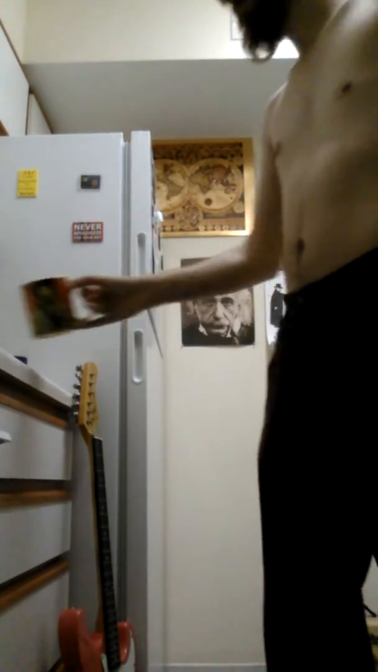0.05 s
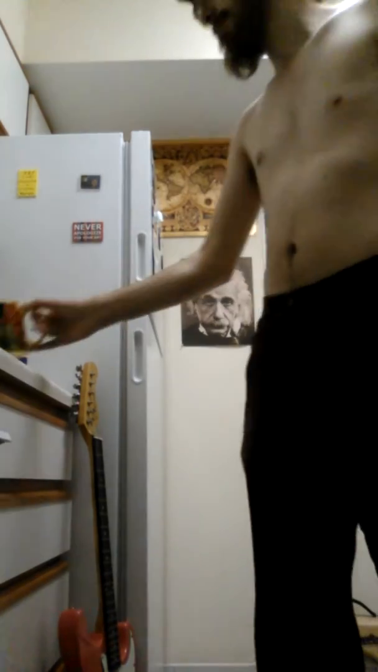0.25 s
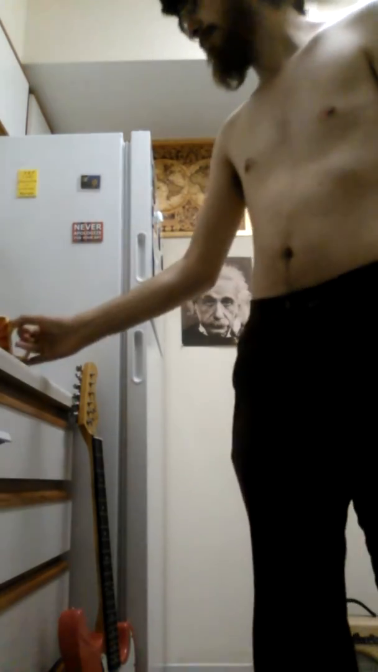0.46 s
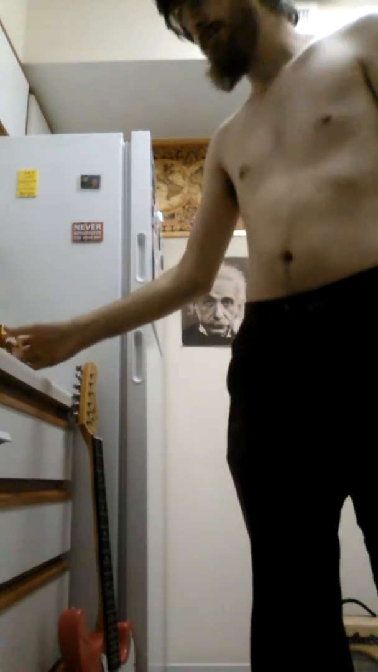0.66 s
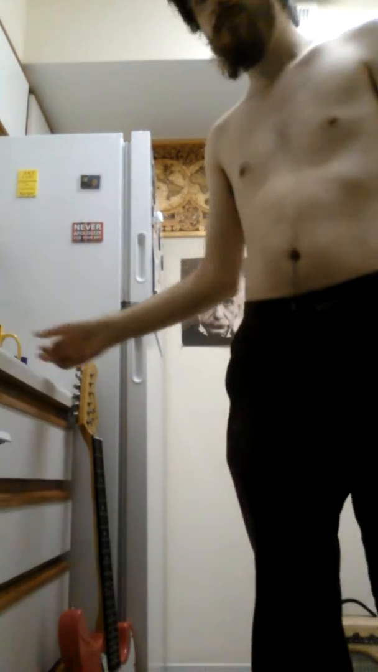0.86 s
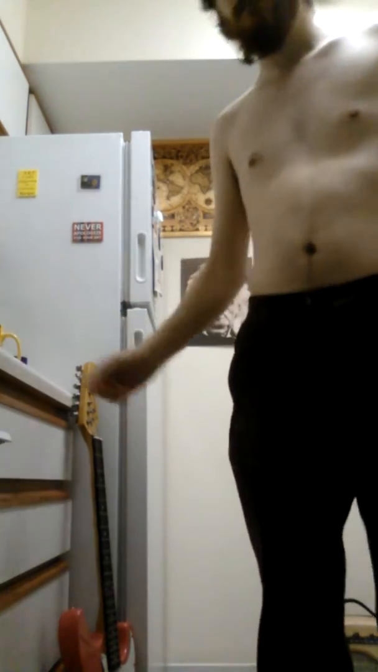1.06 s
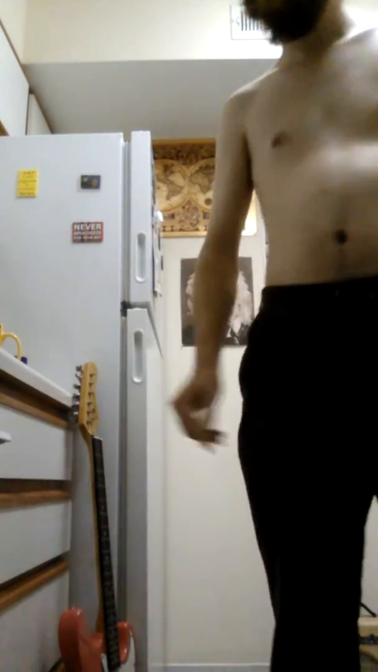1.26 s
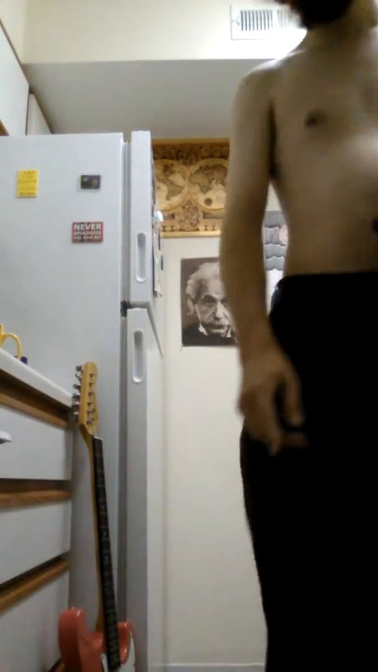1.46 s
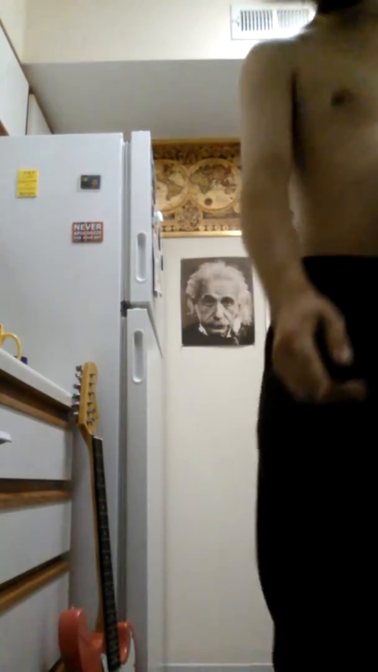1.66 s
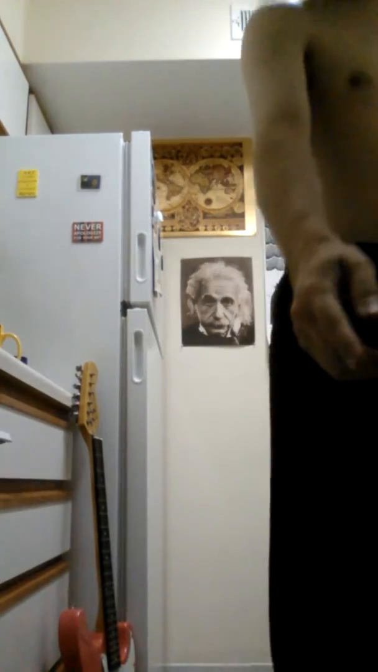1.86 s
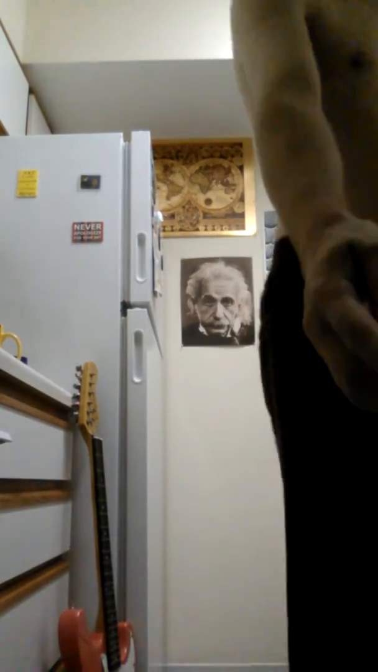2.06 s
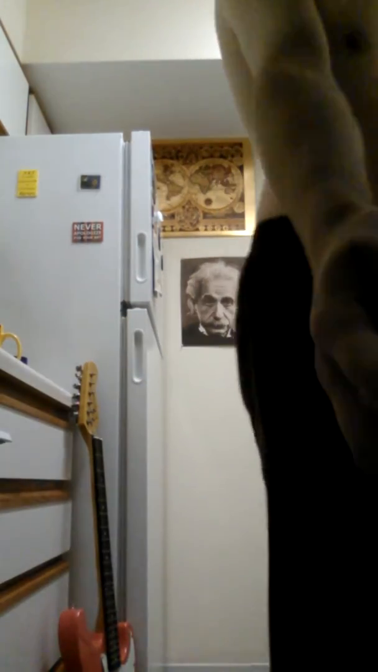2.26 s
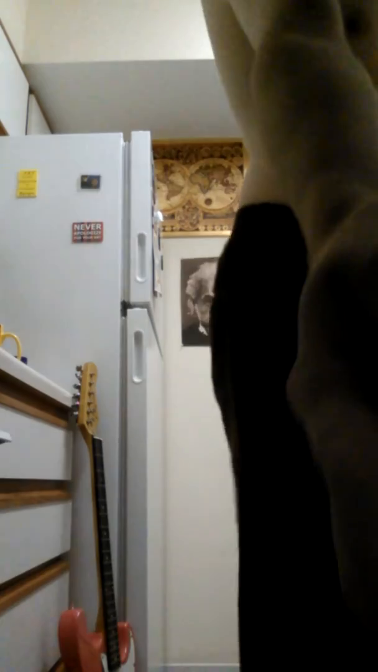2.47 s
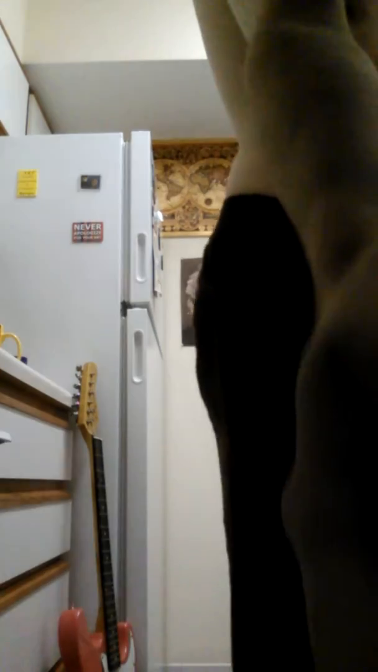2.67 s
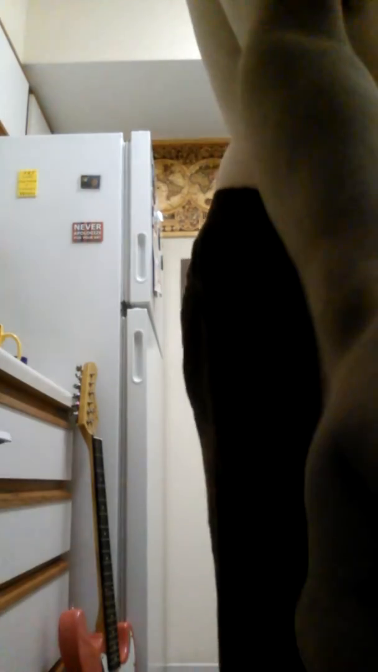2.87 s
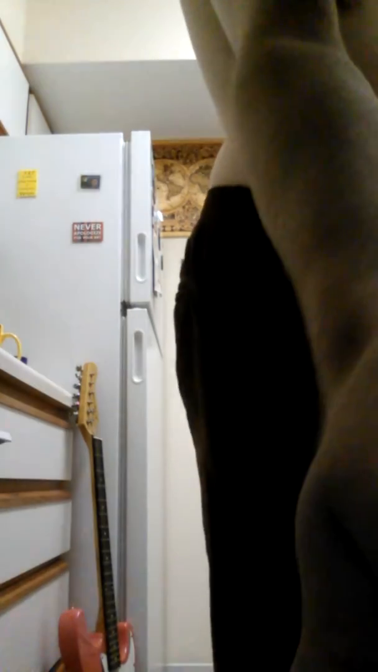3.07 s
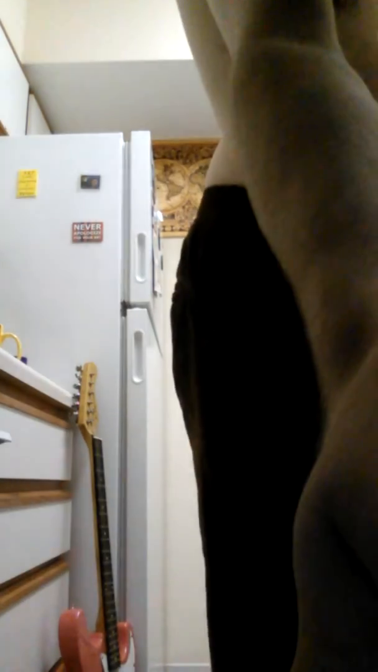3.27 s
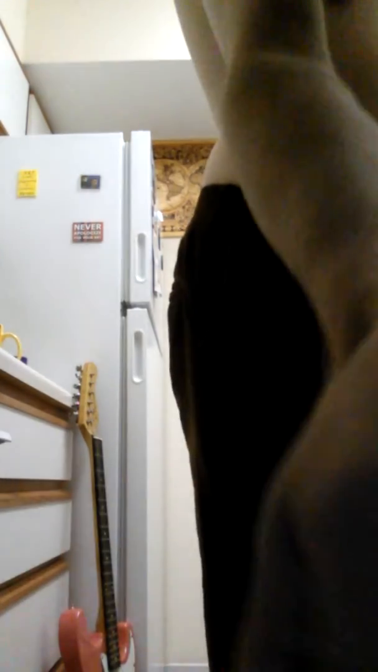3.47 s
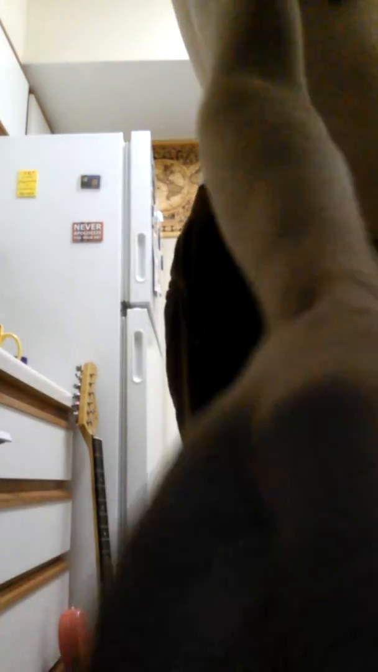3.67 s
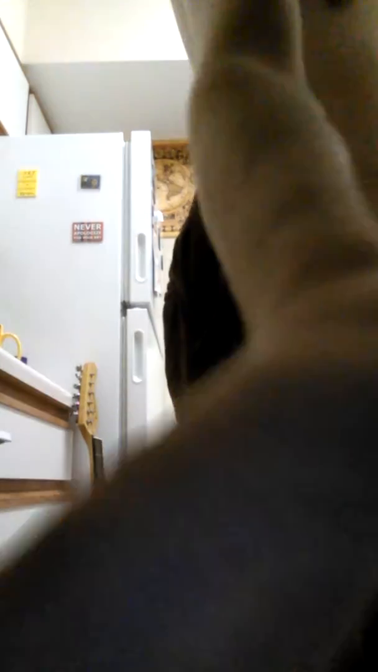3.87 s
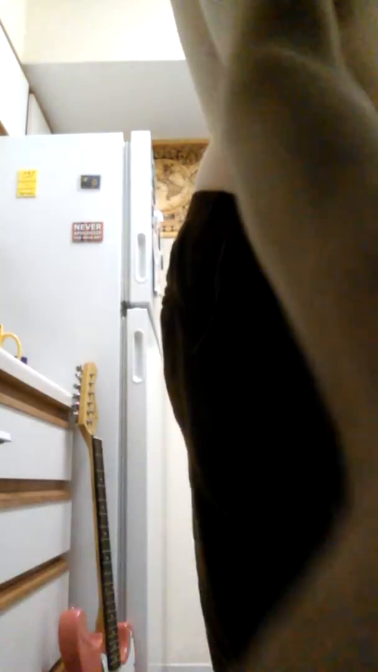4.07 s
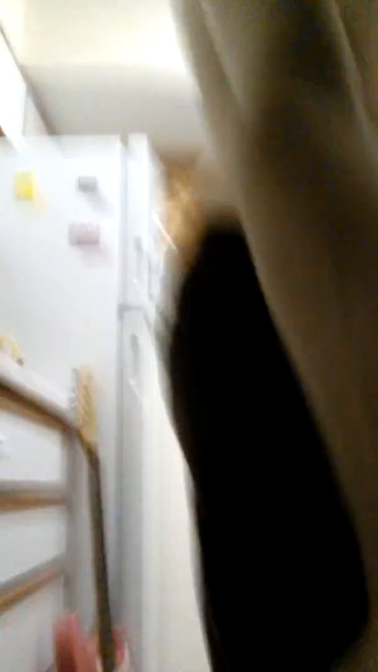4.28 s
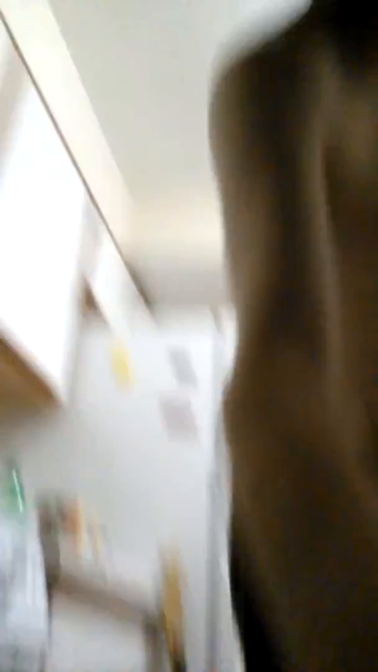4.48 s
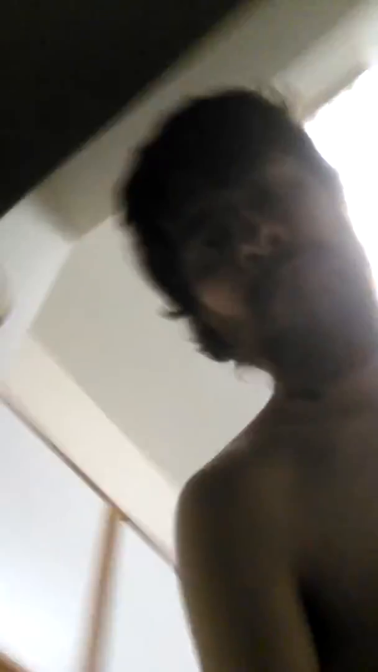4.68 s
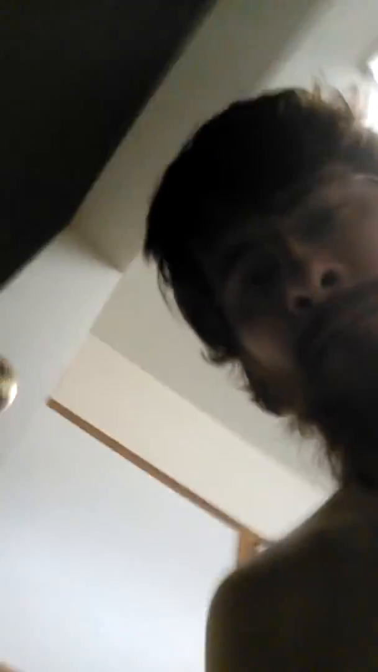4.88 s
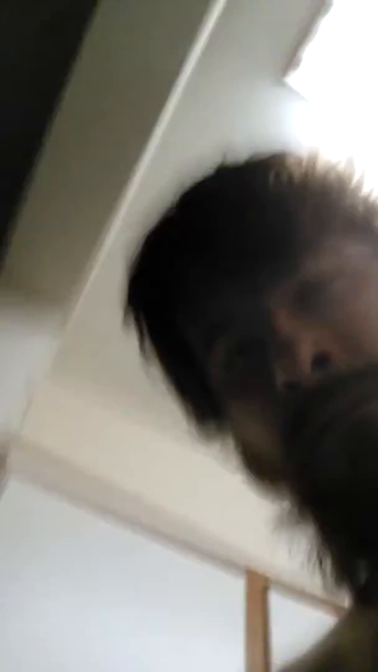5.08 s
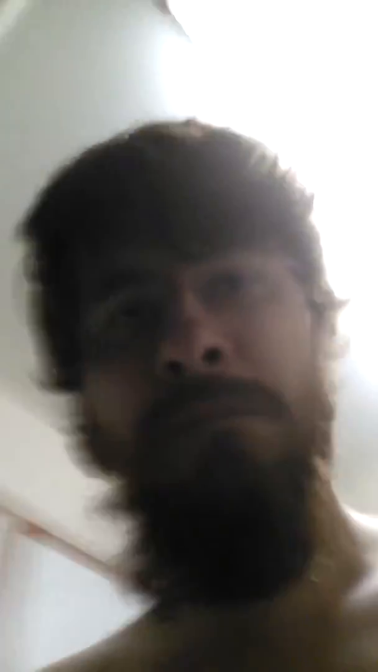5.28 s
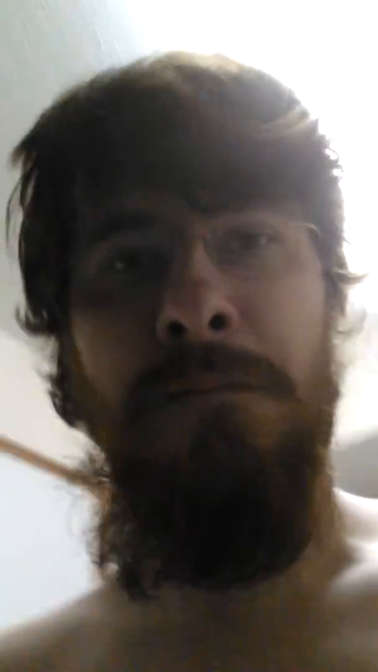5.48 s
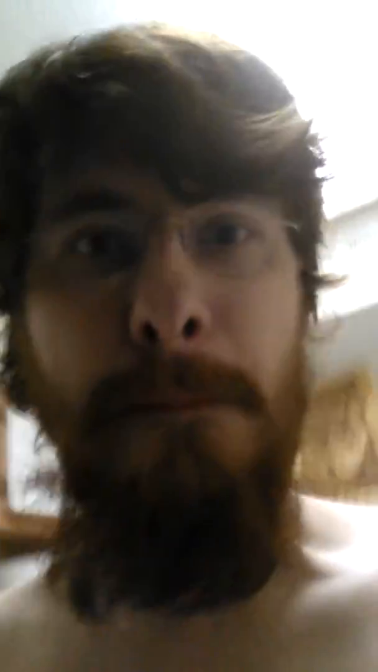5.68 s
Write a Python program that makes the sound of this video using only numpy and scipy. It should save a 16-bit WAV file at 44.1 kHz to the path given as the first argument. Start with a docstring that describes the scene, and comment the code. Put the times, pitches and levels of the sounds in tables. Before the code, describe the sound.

Camera microphone standing in a modest, short-echo kitchen. Two strong hollow counter knocks from a mug come within the first second, joined by a short rough drag. Quiet hum, airy hiss and a few faint steps fill the middle. Then fingers grab the plastic case, very close and dry: a rapid cluster of snaps and thuds, a brief rumbling lull, and more scattered clicks and skin rubs until the end.

```python
"""A ceramic mug knocks on a kitchen counter, judders as it slides, and drops flat with a short ring.
Knocks are damped modes plus shaped noise; the slide is stick-slip pulses and noise through resonances.
A fridge hums (sines) while someone shuffles over (noise bursts, damped tones) to a camera and picks it up:
its plastic case clicks (damped bursts), rubs (grainy noise) and rumbles (low noise) at the microphone."""
import sys
import numpy as np
from scipy import signal
from scipy.fft import rfft, irfft, next_fast_len
from scipy.io import wavfile
from scipy.ndimage import map_coordinates

SR = 44100
rng = np.random.default_rng(int(sys.argv[2]) if len(sys.argv) > 2 else 0)


def wav_record(signal):
    """Record a signal, one row per channel, as 16-bit PCM in the file named by sys.argv[1]."""
    frames = np.transpose(np.atleast_2d(signal))
    bounded = np.clip(frames, -1, 1)
    # unit amplitude maps onto the largest positive 16-bit level
    quanta = np.round(bounded * 32767).astype(np.int16)
    wavfile.write(sys.argv[1], SR, quanta)


N = 253134
TIME = np.arange(N) / SR

# mug blows on the counter: (time [s], level [dB], contact cut-off [Hz], boom [dB], ceramic ring [dB])
MUG_BLOWS = [(0.44, -4, 1806, 0.5, -46), (0.6501, -2, 3016, -6, -16)]
# counter and cabinet modes: (frequency [Hz], nominal level [dB], t60 [s])
COUNTER_MODES = [(87.3, -2.5, 0.29), (123.6, -4, 0.33), (161.4, -6.5, 0.24), (238.7, -10, 0.34),
                 (320, -9.5, 0.2), (386.4, -8, .3), (434.6, -0.5, 0.3), (527.4, -1, 0.29), (657, -7.5, .2),
                 (677, -6.5, 0.19), (805, -4.5, .22), (960, -2.5, 0.18), (1018, -4, .24),
                 (1233, -6.5, 0.12), (1420, -7.5, 0.18), (1442, -3.5, 0.17), (1585, -4.5, .2),
                 (1762, -3, 0.17), (1940, -13, .25), (2420, -20.5, .25)]
# mug wall modes: (frequency [Hz], level [dB], t60 [s])
CERAMIC_MODES = [(2924, 0.5, 0.44), (7400, -15, .33), (7830, -20.5, 0.27), (8930, -22, .36),
                 (9679, -24.5, .34), (12500, -28, .22), (13900, -30, .2)]
# dense counter response: (frequency [Hz], relative density [dB per Hz])
BOARD_SPECTRUM = [(40, -28.5), (80, 2), (130, -9.5), (200, -8), (420, 0.5), (750, -3), (1100, -2.5),
                  (1750, -5), (2600, -13.5), (4500, -21), (9500, -25.5), (15000, -44.5)]
# kitchen decay: (frequency [Hz], t60 [s])
KITCHEN_DECAY = [(80, 0.52), (400, 0.29), (1200, 0.29), (3000, 0.28), (8000, 0.33), (15000, 0.11)]
# resonances under the drag: (frequency [Hz], width [Hz], level [dB])
DRAG_PEAKS = [(313, 30, 6.5), (465, 85, -5.5), (830, 250, -8), (1320, 520, -36.5)]
# finger squeaking off the glaze: (time [s], start [Hz], end [Hz], level [dB], t60 [s])
FINGER_RELEASE = (.967, 2800, 2650, -42, .2)
# feet and cloth brushing: (time [s], level [dB], rise [s], t60 [s], hiss centre [Hz], hiss level [dB])
FOOT_BRUSHES = [(0.143, -41, 0.0022, 0.29, 8350, -44.5), (0.965, -37, 0.004, 0.2, 6040, -41.5),
                (1.439, -45, 0.011, 0.54, 6500, -72), (1.532, -39.5, 0.017, 0.23, 6570, -45.5),
                (3.116, -36, 0.0011, 0.049, 12500, -53), (3.14, -54, 0.026, 0.42, 5440, -54.5),
                (3.465, -42.5, 0.023, 0.054, 5700, -55)]
# brushing cloth: (frequency [Hz], relative density [dB per Hz])
CLOTH_SPECTRUM = [(1180, -6.5), (2000, -8), (2220, -8.5), (2640, -14), (3610, -15), (5490, -9.5),
                  (8260, -1.5), (11000, -5), (16000, -25)]
# floor creaks and footfalls: (time [s], level [dB], pitch [Hz], t60 [s], tick level [dB])
FLOOR_STEPS = [(0.146, -39.5, 169, .15, -49), (0.975, -33.5, 191, 0.14, -40),
               (3.1198, -31.5, 496, 0.17, -33), (3.168, -33.5, 484, 0.26, -45),
               (3.235, -31, 134, 0.064, -36.5)]
# tick of a step: (frequency [Hz], relative density [dB per Hz])
STEP_TICK_SPECTRUM = [(200, 0), (1000, 8.0), (2200, -3.5), (3500, -13.5), (15000, -41)]
# case clicking under the fingers: (time [s], level [dB], shell pitch [Hz], snap level [dB])
CASE_CLICKS = [(4.258, -29.5, 1050, -50), (4.268, -34, 2310, -32.5), (4.298, -39, 1400, -30),
               (4.3295, -29, 1940, -31), (4.412, -11.5, 2190, -17), (4.4148, -13.5, 2060, -2),
               (4.4332, -22.5, 1850, -20), (4.7229, -29.5, 1620, -46), (4.7871, -22, 1370, -31.5),
               (4.7945, -18.5, 1590, -42), (4.831, -26, 1320, -36), (4.8476, -21.5, 1600, -32),
               (4.87, -28.5, 1740, -47), (5.076, -24.5, 1300, -22.5), (5.084, -25.5, 1360, -22.5),
               (5.1352, -15, 1970, -21), (5.1444, -15, 1740, -13.5), (5.1967, -31, 1800, -29),
               (5.2654, -10.5, 2110, -9.5), (5.3353, -28, 1200, -38), (5.3686, -8, 1510, -20),
               (5.411, -21, 1040, -33.5), (5.5342, -26, 2070, -32.5), (5.641, -34.5, 1040, -58)]
# creaking runs of ticks as the grip tightens: (time [s], length [s], mean level [dB])
GRIP_CREAKS = [(4.3, .06, -29), (4.386, .045, -22), (4.731, .012, -33.5), (4.835, .022, -29.5),
               (5.12, 0.042, -25)]
# camera rocking on its support as it is seized: (time [s], level [dB], snap level [dB])
CASE_BUMPS = [(4.3044, -21.5, -20), (4.3119, -18, -10), (4.342, -20.5, -35), (4.3467, -8, -10),
              (4.356, -18, -28), (4.3595, -17, -28), (4.3667, -22.5, -5.5)]
# bright snap of the case: (frequency [Hz], relative density [dB per Hz])
SNAP_SPECTRUM = [(2500, -9), (4700, 1), (6000, -3.5), (7500, -1.5), (10500, -2), (13000, -15), (16000, -25)]
# grit of the shell: (frequency [Hz], relative density [dB per Hz])
GRIT_SPECTRUM = [(400, -12.5), (1000, 2), (2300, -7), (3500, -7.0), (8000, -31.0)]
# fingers sliding on the case: (time [s], length [s], level [dB], sizzle level [dB])
FINGER_RUBS = [(4.147, 0.35, -46.5, -60), (4.35, 0.11, -22, -36), (4.391, 0.25, -49.5, -52.5),
               (4.66, 0.25, -48.5, -57), (4.822, 0.052, -34.5, -52), (4.846, 0.24, -48.5, -46.5),
               (5.012, 0.42, -43, -56), (5.329, 0.073, -29.5, -36), (5.387, 0.075, -40.5, -42.5),
               (5.446, 0.09, -41, -42)]
# skin on plastic: (frequency [Hz], relative density [dB per Hz])
SKIN_SPECTRUM = [(150, 1.5), (600, -2.5), (1600, 3.5), (2900, -9), (4100, -7), (5500, -9), (10500, -7),
                 (13000, -20), (16000, -21)]
# bright part of a rub: (frequency [Hz], width [Hz], level [dB])
SIZZLE_PEAK = [(10100, 3600, 0)]
# skin catching: (time [s], length [s], pitch [Hz], level [dB])
SKIN_SQUEAKS = [(5.28, 0.13, 8000, -46.5), (5.461, 0.044, 10900, -35), (5.462, 0.071, 6170, -35.5),
                (5.629, 0.14, 7060, -46)]
# handling rumble: (frequency [Hz], relative density [dB per Hz])
SHAKE_SPECTRUM = [(8.8, -25.5), (15, 8), (49, 3.5), (145, -19.5), (216, -17), (326, -39), (373, -28),
                  (400, -28), (520, -58), (880, -120)]
# the hand heaving the camera about: (time [s], length [s], level [dB])
HAND_HEAVES = [(4.31, 0.066, -27), (4.615, 0.22, -26.5), (4.78, 0.28, -28.5), (5.33, 0.11, -41)]
# room air: (frequency [Hz], relative density [dB per Hz])
AIR_SPECTRUM = [(20, -1.5), (50, 4), (90, -20.5), (130, -7.5), (190, -8), (240, -4), (330, -2.5),
                (420, -9.5), (850, -12.5), (1200, -16), (2000, -23), (4000, -35.5), (8000, -85)]
# hiss and rustle: (frequency [Hz], relative density [dB per Hz])
HISS_SPECTRUM = [(1800, -36.5), (3000, -13), (5000, -8), (7000, -6.5), (8400, 1.5), (10000, -3.5),
                 (12000, -8.5), (14000, -10.5), (16000, -19.5)]
# fridge hum: (frequency [Hz], nominal level [dB rms])
FRIDGE_HUM = [(21.5, -58), (43.1, -48), (64.5, -59), (118.4, -64), (220.7, -60), (312.2, -60)]
# fridge's electrical whine: (frequency [Hz], nominal level [dB rms])
FRIDGE_WHINE = [(5152, -78.5), (8226, -62.5)]
# fridge vent: (frequency [Hz], width [Hz], level [dB])
VENT_PEAK = [(344, 99, 0)]
# trousers rustling as the body moves: (time [s], length [s], level [dB])
TROUSER_RUSTLES = [(0, 0.17, -54.5), (.55, 0.47, -51), (1.5, 0.76, -57), (1.9, .9, -67.5), (3.4, .3, -70)]

# the push builds, holds, and eases as the mug tips flat
SLIDE_S, SLIDE_HOLD_S, SLIDE_DB = .588, 0.029, -19.5
SLIDE_RISE_DB_PER_S, SLIDE_FALL_DB_PER_S = 171.5, 400.5
# thud re level, port ring re snap
BUMP_THUD_DB, BUMP_SHELL_HZ, BUMP_PORT_DB = 1.5, 1150, -20
CASE_THUD_HZ, CONTACT_RISE_S = 343, 0.0011  # thud pitch is the median
CLICK_THUD_DB = -18.5  # re level: a finger barely moves the whole camera
# port ring for a 0 dB snap; for clicks it grows faster than the snap
PORT_HZ, PORT_DB, PORT_DB_PER_SNAP_DB = 4030, 1.5, 1.41
TICKS_PER_S, TICK_SPREAD_DB, TICK_HZ, TICK_SNAP_DB = 160, 2.5, 1640, -11  # snap re level
SQUEAK_WIDTH = 0.079  # share of the pitch
RUB_TAPER = 0.83  # share of a stroke spent rising and falling
# the camera comes up into the hand and trembles there
LIFT_S, LIFT_LENGTH_S, TREMOR_DB = 4.3, 0.13, -41.5
# room floor; the air is louder once the camera is held in the open and murmurs unevenly
AIR_DB, HISS_DB, AIR_LIFTED_DB = -48, -61, 2.5
AIR_WAVER_DB, AIR_WAVERS_PER_S = 0.54, 20
VENT_S, VENT_LENGTH_S, VENT_DB = 5.1, 0.643, -45.5  # heard while the microphone swings past it
# a leg passes in front of the microphone
SHADE_S, SHADE_WIDTH_S, SHADE_AIR_DB, SHADE_HISS_DB = 3.95, 0.31, -3, -5
MAINS_HZ, WHINE_SWING_RAD = 60, .8
HUM_LIFTED_DB = -3  # hum comes partly through the support and weakens in the hand
WHINE_BLOCKED_DB = -2  # from the leg's passing on, the body stays between fridge and microphone
TOP_HZ = 16000


def amp(db):
    """Decibels to gain."""
    return 10 ** (np.asarray(db) / 20)


def unit(x):
    """Scale to rms 1."""
    return x / np.sqrt(np.mean(x ** 2) + 1e-20)


def along(points, hz):
    """(Hz, value) points read on a log frequency axis."""
    f, v = np.transpose(points)
    return np.interp(np.log(hz + 1), np.log(f + 1), v)


def wobble(rate, size=N):
    """A smooth random curve, rate knots a second."""
    knots = rng.standard_normal(int(size * rate / SR) + 4)
    return map_coordinates(knots, [TIME[:size] * rate])


def filtered(x, response):
    """x times a response of frequency."""
    m = next_fast_len(len(x) + 8192)
    hz = np.fft.rfftfreq(m, 1 / SR)
    return irfft(rfft(x, m) * response(hz), m)[:len(x)]


def noise(spectrum, size=N):
    """Coloured noise of rms 1."""
    white = rng.standard_normal(size)
    return unit(filtered(white, lambda hz: amp(along(spectrum, hz))))


def resonate(x, peaks):
    """x through parallel (Hz, width, dB) resonances of alternating sign."""
    def response(f):
        total = 0
        for k, (centre, width, db) in enumerate(peaks):
            damping = 1j * f * width
            total = total + (-1) ** k * amp(db) * damping / (centre * centre - f * f + damping)
        return total
    return filtered(x, response)


def fade(t, t60):
    """Exponential decay, 60 dB in t60 seconds."""
    return np.exp(-np.log(1000) * t / t60)


def ring(t, hz, t60):
    """One damped mode."""
    return np.sin(2 * np.pi * hz * t) * fade(t, t60)


def add(track, s, sound):
    """Mix a sound in at time s."""
    part = track[max(round(s * SR), 0):][:len(sound)]
    part += sound[:len(part)]


def swell(length, taper):
    """A stroke that rises, holds and falls; taper is the share spent rising and falling."""
    return signal.windows.tukey(int(length * SR), taper)


def strokes(rows, taper):
    """The envelope of (time, length, dB) strokes."""
    out = np.zeros(N)
    for s, length, db in rows:
        add(out, s, amp(db) * swell(length, taper))
    return out


def reverberant(x, hold):
    """Noise held level for hold seconds, then dying band by band."""
    hz, t, z = signal.stft(x, SR, nperseg=256)
    t60 = along(KITCHEN_DECAY, hz)[:, None]
    decay = fade(np.maximum(t - hold, 0), t60)
    return signal.istft(z * decay, SR, nperseg=256)[1][:len(x)]


def room(x, wet_db):
    """A source with the kitchen's answer."""
    tail = reverberant(rng.standard_normal(SR // 2), hold=0.014)
    return x + amp(wet_db) * signal.fftconvolve(x, tail / np.linalg.norm(tail))[:N]


def lifted():
    """0 while the camera stands, 1 once it is in the hand."""
    return np.clip((TIME - LIFT_S) / LIFT_LENGTH_S, 0, 1)


def tones(table, level_db, level_rate, phase):
    """Steady sines of wavering level; phase() gives each one's phase deviation."""
    out = np.zeros(N)
    for hz, db in table:
        level = amp(db + level_db * wobble(level_rate)) * np.sqrt(2)
        out += level * np.sin(2 * np.pi * hz * TIME + phase())
    return out


def background():
    """Fridge hum, vent and whine, room air, hiss and rustling cloth; a passing leg shades the microphone."""
    shade = np.exp(-((TIME - SHADE_S) / SHADE_WIDTH_S) ** 2)
    blocked = np.clip((TIME - SHADE_S) / SHADE_WIDTH_S, 0, 1)
    held = lifted()
    hum = tones(FRIDGE_HUM, 1.8, 3.6, lambda: 0.19 * wobble(5))
    buzz = WHINE_SWING_RAD * np.sin(2 * np.pi * MAINS_HZ * TIME)
    whine = tones(FRIDGE_WHINE, 1.5, 6, lambda: buzz + .4 * wobble(30))
    waver_db = AIR_WAVER_DB * wobble(AIR_WAVERS_PER_S)
    air_db = AIR_DB + SHADE_AIR_DB * shade + AIR_LIFTED_DB * held + waver_db
    air = amp(air_db) * noise(AIR_SPECTRUM)
    vent = unit(resonate(rng.standard_normal(N), VENT_PEAK))
    vent *= strokes([(VENT_S, VENT_LENGTH_S, VENT_DB)], taper=0.2)
    hiss_level = np.hypot(amp(HISS_DB), strokes(TROUSER_RUSTLES, taper=.7))
    hiss = hiss_level * amp(0.49 * wobble(12)) * noise(HISS_SPECTRUM)
    treble = hiss + amp(WHINE_BLOCKED_DB * blocked) * whine
    return amp(HUM_LIFTED_DB * held) * hum + air + vent + amp(SHADE_HISS_DB * shade) * treble


def shuffle():
    """Soles and trousers brush; the floor creaks and thumps under the weight."""
    out, t = np.zeros(N), TIME[:SR // 2]
    for s, db, rise, t60, hz, hiss_db in FOOT_BRUSHES:
        envelope = np.minimum(t / rise, 1) * fade(np.maximum(t - rise, 0), t60)
        hiss = unit(resonate(rng.standard_normal(len(t)), [(hz, 1100, 0)]))
        cloth = noise(CLOTH_SPECTRUM, size=len(t))
        add(out, s, envelope * (amp(db) * cloth + amp(hiss_db) * hiss))
    for s, db, hz, t60, tick_db in FLOOR_STEPS:
        tick = noise(STEP_TICK_SPECTRUM, size=len(t)) * fade(t, 0.0445)
        # the board rubs unevenly, so its pitch is rough
        waver = wobble(103, size=len(t)) / (2 * np.pi * hz)
        add(out, s, amp(db) * ring(t + .3 * waver, hz, t60) + amp(tick_db) * tick)
    return room(out, wet_db=-4.5)


def grip():
    """The hand's tremor and its heaves reach the microphone as a low rumble."""
    level = amp(TREMOR_DB) * lifted() + strokes(HAND_HEAVES, taper=0.66)
    return level * noise(SHAKE_SPECTRUM)


def rubs():
    """Skin drags over the case in grainy strokes and now and then squeaks."""
    out, skin = np.zeros(N), noise(SKIN_SPECTRUM)
    sizzle = unit(resonate(rng.standard_normal(N), SIZZLE_PEAK))
    for s, length, db, sizzle_db in FINGER_RUBS:
        stroke = strokes([(s, length, 0)], RUB_TAPER)
        out += stroke * (amp(db) * skin + amp(sizzle_db) * sizzle)
    for s, length, hz, db in SKIN_SQUEAKS:
        squeak = unit(resonate(rng.standard_normal(SR // 4), [(hz, SQUEAK_WIDTH * hz, 0)]))
        stroke = swell(length, taper=0.62)
        add(out, s, amp(db) * stroke * squeak[:len(stroke)])
    grain_db = 1.9 * wobble(350) + 0.84 * wobble(1500)
    return out * amp(grain_db)


def burst(x):
    """Scale to the energy of 4 ms at rms 1."""
    return x / np.sqrt(np.sum(x ** 2) / (.004 * SR))


def case(hz, shell_db, thud_db, port_db, snap_db):
    """One contact on the case: a dull thud, a shell mode, the ringing microphone port and a bright snap."""
    t = TIME[:SR // 20]
    onset = 1 - np.exp(-(t / CONTACT_RISE_S) ** 2)
    thud_hz = CASE_THUD_HZ * np.exp(rng.normal(0, 0.41))
    thud = burst(onset * ring(t, thud_hz, 0.0087))
    grit = onset * noise(GRIT_SPECTRUM, size=len(t)) * fade(t, 0.019)
    shell = burst(burst(onset * ring(t, hz, 0.0052)) + 0.73 * burst(grit))
    port = burst(onset * ring(t, PORT_HZ + rng.normal(0, 88), 0.015))
    snap_decay = fade(t, 0.0042) + 0.013 * fade(t, 0.031)
    snap = burst(noise(SNAP_SPECTRUM, size=len(t)) * onset * snap_decay)
    return amp(thud_db) * thud + amp(shell_db) * shell + amp(port_db) * port + amp(snap_db) * snap


def bumps():
    """The whole camera knocks on its support, so every contact thuds."""
    out = np.zeros(N)
    for s, db, snap_db in CASE_BUMPS:
        add(out, s, case(BUMP_SHELL_HZ, db, db + BUMP_THUD_DB, snap_db + BUMP_PORT_DB, snap_db))
    return out


def clicks():
    """Single case clicks and runs of small random ticks; the harder the snap, the more the port rings."""
    out, contacts = np.zeros(N), list(CASE_CLICKS)
    for start, length, db in GRIP_CREAKS:
        for k, (late, size, pitch) in enumerate(rng.standard_normal((12, 3))):
            after = max(k + .35 * late, 0) / TICKS_PER_S
            if after < length:
                level = db + TICK_SPREAD_DB * size
                tick_hz = TICK_HZ * np.exp(.17 * pitch)
                contacts.append((start + after, level, tick_hz, level + TICK_SNAP_DB))
    for s, db, hz, snap_db in contacts:
        port_db = PORT_DB + PORT_DB_PER_SNAP_DB * snap_db
        add(out, s, case(hz, db, db + CLICK_THUD_DB, port_db, snap_db))
    return out


def release():
    """A fingertip leaves the glaze with a small falling squeak."""
    out, t = np.zeros(N), TIME[:SR // 4]
    s, start_hz, end_hz, db, t60 = FINGER_RELEASE
    glide_hz = np.interp(t, [0, .05], [start_hz, end_hz])
    pitch_hz = glide_hz * (1 + .018 * wobble(394, size=len(t)))
    add(out, s, amp(db) * fade(t, t60) * np.sin(2 * np.pi * np.cumsum(pitch_hz) / SR))
    return room(out, wet_db=-14)


def slide():
    """The tilted base sticks and slips over the counter at an uneven rate."""
    turns = np.cumsum(160 * np.exp(0.085 * wobble(90))) / SR
    slips = np.diff(np.floor(turns), prepend=0) * amp(2.9 * wobble(120))
    scrape = unit(slips) + 1.3 * rng.standard_normal(N)
    drag = unit(resonate(scrape, DRAG_PEAKS))
    drag = filtered(drag, lambda hz: 1 / (1 + (hz / 2000) ** 4))
    before_s = np.maximum(SLIDE_S - TIME, 0)
    after_s = np.maximum(TIME - SLIDE_S - SLIDE_HOLD_S, 0)
    push_db = -SLIDE_RISE_DB_PER_S * before_s - SLIDE_FALL_DB_PER_S * after_s
    after_first_blow = TIME > MUG_BLOWS[0][0]
    return room(drag * amp(SLIDE_DB + push_db) * after_first_blow, wet_db=-13.5)


def mug():
    """Each blow shakes the counter and rings the mug; a softer contact passes less treble."""
    out, t = np.zeros(N), TIME[:SR]
    fill_out = 1 - 0.5 * np.exp(-t / 0.014)  # starts at half level, fills out within some 14 ms
    bloom = 1 - 0.73 * np.exp(-(t / 0.061) ** 4)  # the ring swells just after the blow
    wall = bloom * sum(amp(level) * ring(t, hz, t60) for hz, level, t60 in CERAMIC_MODES)
    for s, db, contact_hz, boom_db, ring_db in MUG_BLOWS:
        def contact(hz):
            softness = np.hypot(1 / (1 + (hz / contact_hz) ** 3), contact_hz / 7000)
            return softness * amp(along([(500, boom_db), (1000, 0)], hz))
        dense = unit(filtered(noise(BOARD_SPECTRUM, size=SR), contact))
        modes = np.zeros(SR)
        for hz, level, t60 in COUNTER_MODES:
            gain = rng.choice([-1, 1]) * amp(level + rng.normal(0, 1.2))
            modes += gain * contact(hz) * ring(t, hz, t60)
        counter = amp(-3.0) * reverberant(dense, hold=0.013) + amp(-5.5) * modes
        add(out, s, amp(db) * fill_out * counter + amp(ring_db) * wall)
    return out


def scene():
    """Everything, in mono."""
    kitchen = background() + shuffle()
    handling = grip() + rubs() + bumps() + clicks()
    return (kitchen + handling + release() + slide() + mug())[None]


def limiter(x, ceiling, recovery):
    """Gain falls at once on a peak over the ceiling and recovers at a steady rate (nepers a second)."""
    over = np.log(np.maximum(np.abs(x) / ceiling, 1))
    return x * np.exp(recovery * TIME - np.maximum.accumulate(over + recovery * TIME))


def record(dry):
    """The loudest peaks are limited and rounded off; a steep low-pass cuts above TOP_HZ."""
    x = limiter(dry[0], ceiling=1.19, recovery=82)
    rounded = x / (1 + np.abs(x / .97) ** 10) ** (1 / 10)
    return filtered(rounded, lambda hz: 1 / (1 + (hz / TOP_HZ) ** 100))[None]


dry = scene()
out = record(dry)
wav_record(out)
```